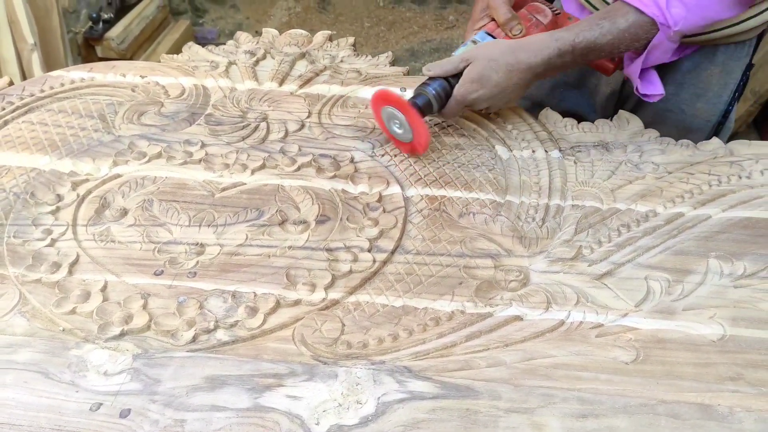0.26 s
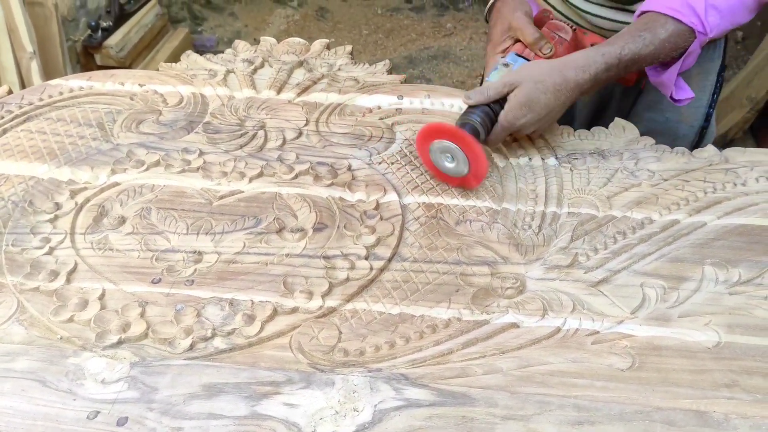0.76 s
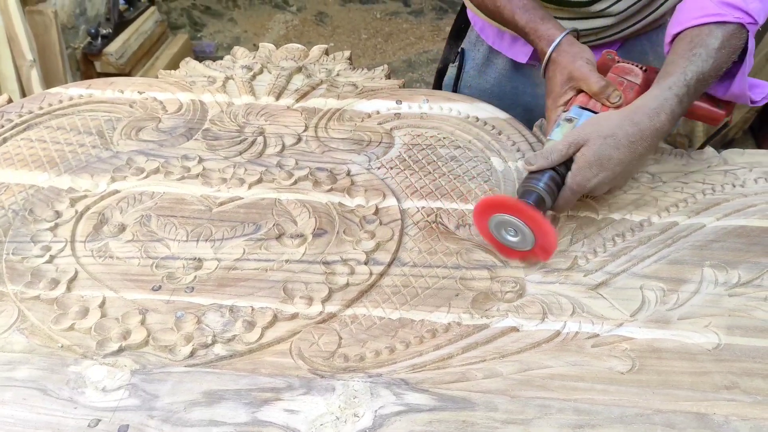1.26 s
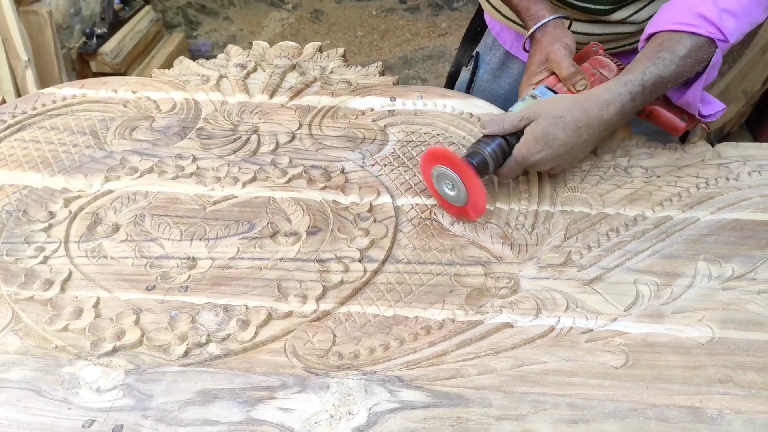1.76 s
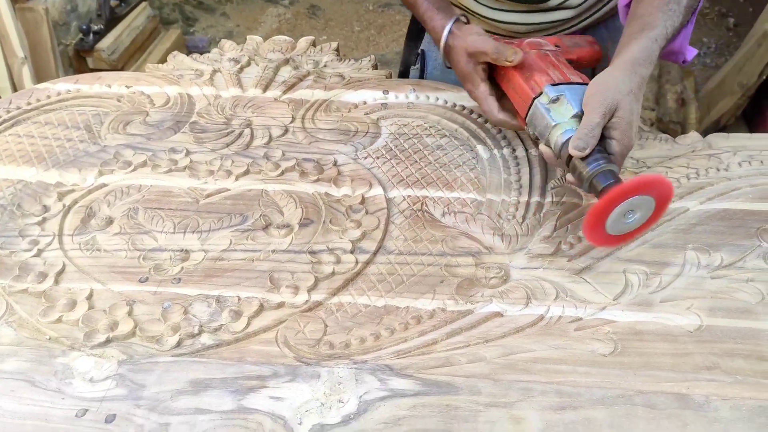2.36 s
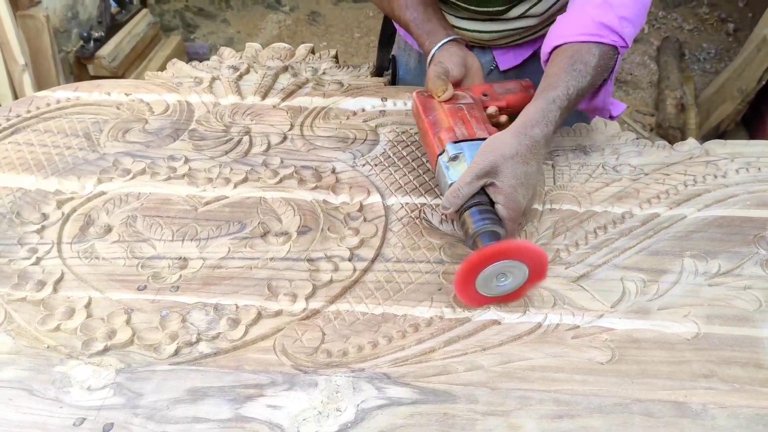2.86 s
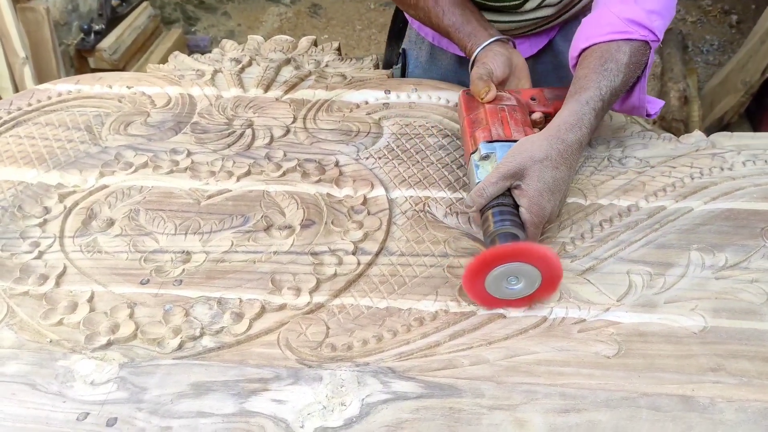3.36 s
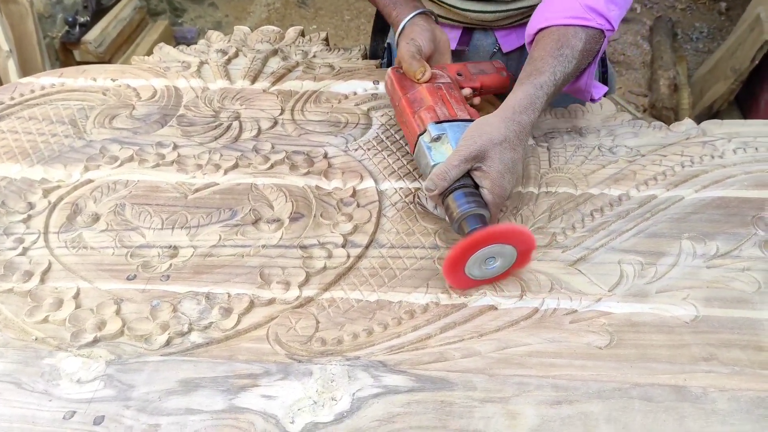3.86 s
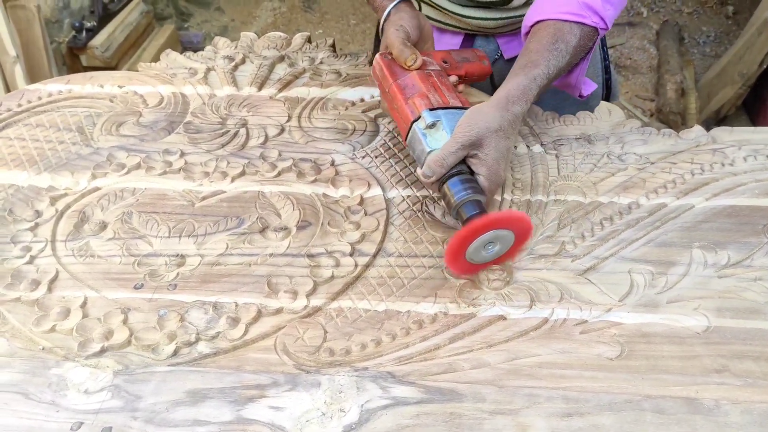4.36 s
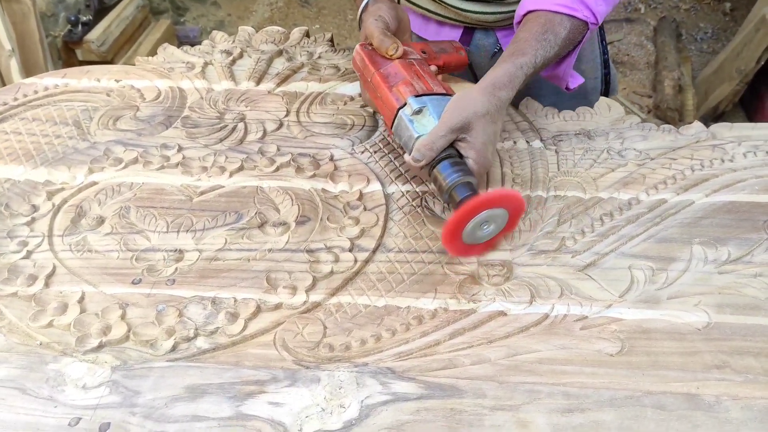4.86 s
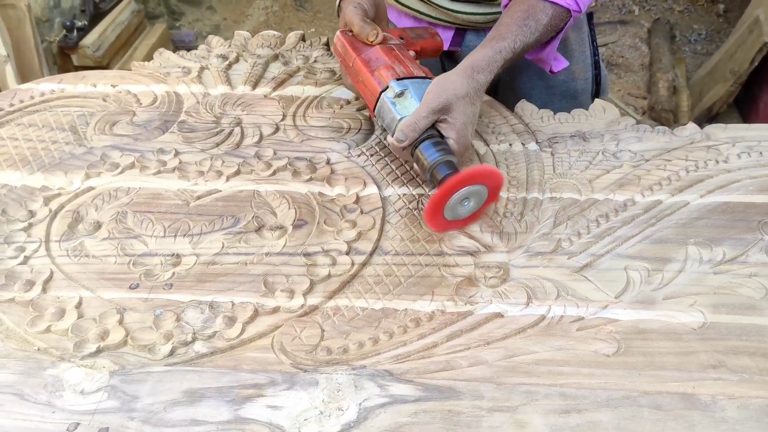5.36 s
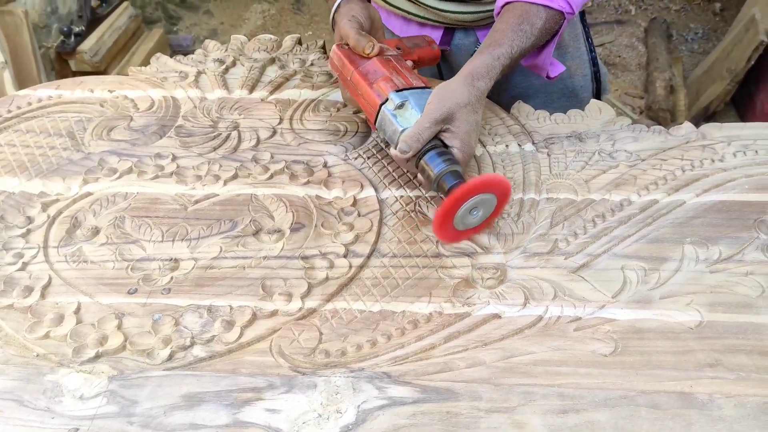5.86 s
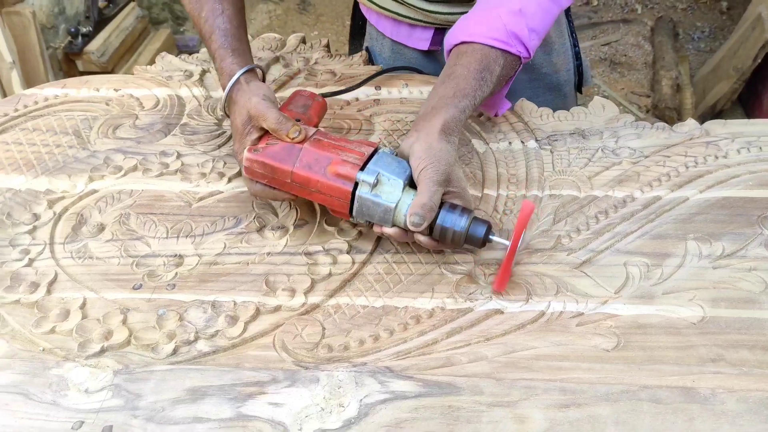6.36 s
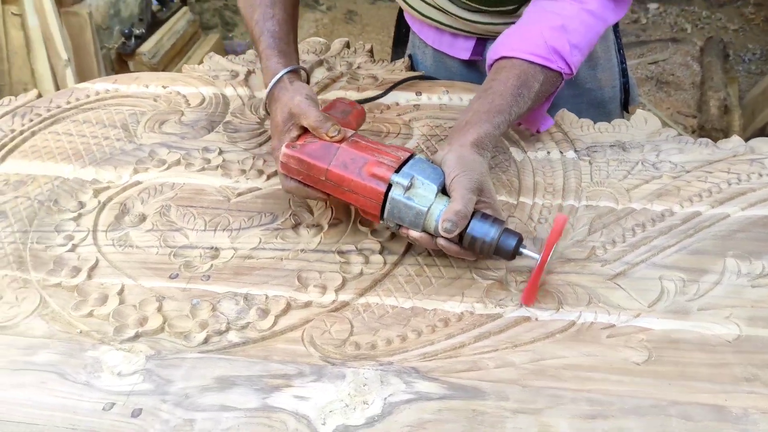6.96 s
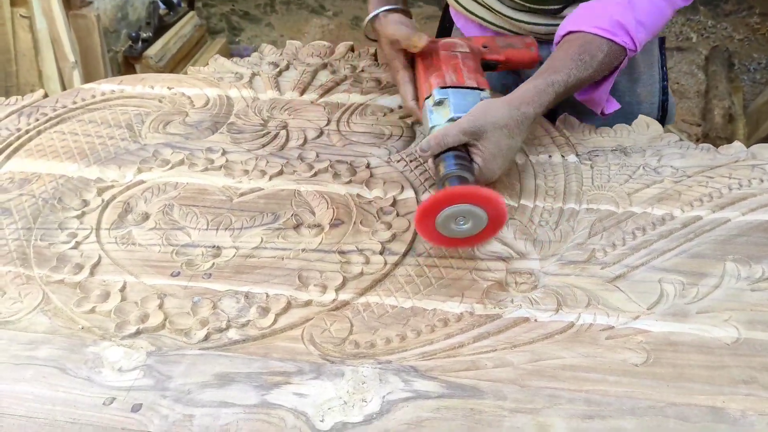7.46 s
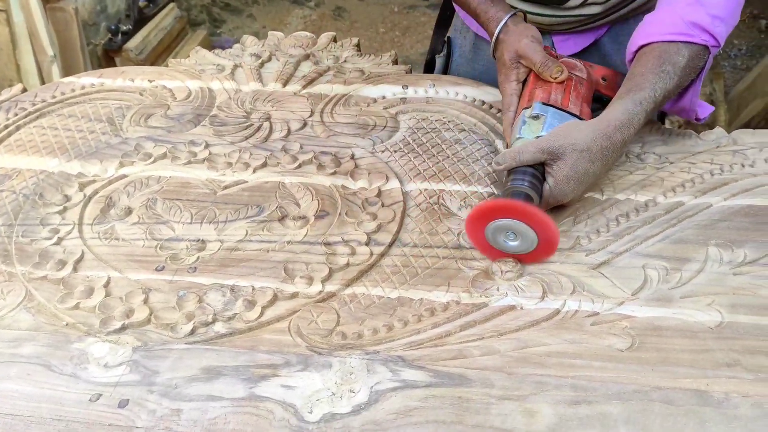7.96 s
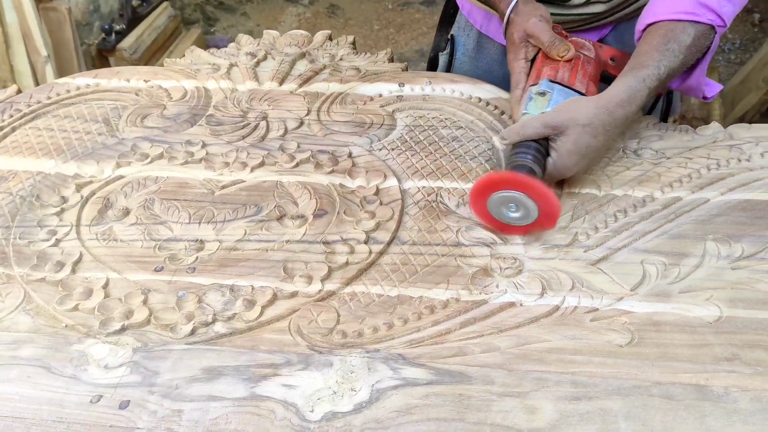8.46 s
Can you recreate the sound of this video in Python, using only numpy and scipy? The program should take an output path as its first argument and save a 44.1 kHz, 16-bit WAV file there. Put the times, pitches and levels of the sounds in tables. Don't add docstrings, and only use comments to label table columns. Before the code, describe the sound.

A close geared electric drill whines and roars without pause, its pitch sagging under load and rising when lifted, bristles rasping on carved wood.

```python
import sys
import numpy as np
from scipy import signal
from scipy.io import wavfile
from scipy.ndimage import uniform_filter1d

SR = 44100
rng = np.random.default_rng(int(sys.argv[2]) if len(sys.argv) > 2 else 0)


def to_wav(s):
    ch = np.atleast_2d(s).T
    pcm = np.round(np.clip(ch, -1, 1) * 32767)
    wavfile.write(sys.argv[1], SR, pcm.astype(np.int16))


def linear_from_db(decibels):
    return 10 ** (np.asarray(decibels, float) / 20)


N = 383669
STEP = 64

# start in seconds, armature speed this load settles to in turns per second [Hz].
PRESSES = [(0.0, 492.0), (0.09, 469.8), (0.21, 537.8), (0.29, 491.5), (0.52, 540.9), (0.69, 535.3),
           (0.85, 519.4), (1.06, 472.1), (1.24, 484.4), (1.37, 519.3), (1.45, 497.2), (1.53, 483.0),
           (1.77, 544.4), (1.85, 491.2), (1.93, 509.6), (2.08, 535.6), (2.17, 537.0), (2.28, 628.2),
           (2.37, 605.2), (2.53, 612.2), (2.79, 563.2), (2.91, 496.1), (3.05, 506.0), (3.34, 494.1),
           (3.53, 498.9), (3.88, 483.8), (4.05, 480.1), (4.17, 485.0), (4.33, 484.2), (4.47, 502.5),
           (4.57, 496.0), (4.69, 505.3), (4.85, 501.8), (4.97, 495.1), (5.05, 500.7), (5.17, 505.8),
           (5.38, 461.8), (5.47, 519.0), (5.57, 495.4), (5.76, 531.6), (5.93, 508.8), (6.03, 619.5),
           (6.21, 605.7), (6.3, 510.2), (6.45, 476.5), (6.73, 472.7), (7.17, 501.0), (7.27, 590.5),
           (7.39, 605.3), (7.49, 600.8), (7.61, 619.0), (7.75, 527.4), (7.86, 465.6), (8.07, 504.6),
           (8.17, 498.3), (8.29, 500.5), (8.53, 484.1), (8.61, 521.9)]
INERTIA_S, HAND_S = 0.25, 0.04
SLACK_HZ, TIGHT_HZ = 598, 550
SLACK_DB, QUICK_LAG_S, SLOW_LAG_S = -15, 0.062, 0.092

PINION_TEETH, SECOND_MESH, SLOTS = 7, 2.76, 12
SECOND_PLAY = 0.34
# multiple of the turn, level at full torque in dB.
UNEVEN_TEETH = [(4, -52), (5, -58), (6, -57), (8, -57), (9, -51.5), (10, -50), (11, -43.5), (13, -60),
                (15, -55), (16, -47), (17, -49), (18, -44), (19, -43), (20, -41), (22, -46), (23, -39),
                (24, -42), (25, -47), (26, -54), (27, -63), (28, -52), (30, -61)]
# pinion multiple, second mesh multiple, level at full torque in dB.
CROSS_TONES = [(0, 2, -56), (0, 3, -53), (1, -1, -55), (1, 1, -47), (2, -1, -47), (1, 3, -52), (2, 1, -54),
               (2, 3, -49)]
# time in seconds, mesh level in dB, its 2nd harmonic in dB, its 3rd in dB.
EARLY_STROKES = [
    [(0.0, -34, -29.5, -36), (0.1, -51.5, -68, -39.5), (0.2, -43, -55, -42), (0.3, -34.5, -34, -38),
     (0.44, -45, -42, -34), (0.54, -48.5, -42, -38), (0.63, -33.5, -47, -46), (0.75, -32.5, -46, -41),
     (0.85, -32, -42, -38), (0.96, -33, -46, -32), (1.08, -29, -45, -34), (1.3, -41, -45.5, -41)],
    [(1.38, -50, -52, -34), (1.5, -37.5, -43, -39), (1.6, -47, -41, -34), (1.68, -44.5, -41, -31),
     (1.8, -37.5, -43, -32.5), (2.01, -41.5, -45, -35), (2.13, -30, -40, -44), (2.22, -29, -39, -39),
     (2.33, -37, -31, -26)],
    [(2.86, -39, -32.5, -24), (3.0, -45, -42, -33), (3.1, -40, -42, -37), (3.16, -32.5, -42, -63),
     (3.58, -35.5, -46, -22.5), (3.67, -33.5, -55, -28.5), (4.06, -35, -36, -27.5), (4.21, -36, -32.5, -31),
     (4.4, -40.5, -33.5, -34)],
]
# time in seconds, mesh level in dB,
# its 2nd harmonic in dB, its 3rd in dB.
LATE_STROKES = [
    [(4.5, -43, -38, -33), (4.62, -41.5, -34, -30), (4.75, -44, -38, -36), (4.9, -40, -39.5, -31),
     (5.25, -35.5, -42.5, -34), (5.43, -36.5, -42, -34), (5.73, -36, -40, -39), (5.88, -36.5, -32, -44),
     (5.97, -30.5, -35, -25), (6.03, -35.5, -37, -44.0), (6.1, -40, -45, -41)],
    [(6.32, -56, -20.5, -25.5), (6.41, -41, -45.0, -40), (6.53, -28.5, -47, -42), (6.65, -27.5, -36, -29.5),
     (6.92, -35.5, -57, -27.5), (7.1, -32, -60, -43), (7.34, -36.5, -33, -37), (7.42, -36, -31, -38)],
    [(7.79, -34, -28, -30), (7.88, -37.5, -35, -42), (8.0, -35, -36, -30), (8.06, -35.5, -36.5, -28),
     (8.12, -38, -42, -53), (8.3, -36, -45, -35), (8.45, -28.5, -41.5, -30), (8.53, -37.5, -43, -42),
     (8.6, -51, -46, -53), (8.7, -31, -41, -36)],
]
# time in seconds, 2nd harmonic in dB, 3rd harmonic in dB.
STROKES_ASIDE = [
    [(0.0, -37, -31), (0.3, -40.5, -29.5), (0.54, -47, -33), (0.63, -40, -40.5), (0.81, -40, -40),
     (0.96, -29, -26), (1.08, -40, -28), (1.3, -38, -29)],
    [(1.38, -37, -32), (1.5, -38, -37), (1.68, -42, -30), (1.8, -44, -25), (2.01, -35, -35),
     (2.13, -34, -44), (2.22, -39, -36), (2.33, -32.0, -20)],
    [(2.86, -29, -28.0), (3.04, -44, -38), (3.16, -37, -44), (3.58, -47.5, -33), (3.67, -49.5, -36),
     (4.06, -38.5, -41), (4.21, -37.5, -42), (4.4, -41, -40)],
    [(4.5, -42, -44), (4.62, -46, -45), (5.25, -33, -38), (5.43, -35, -39), (5.73, -38.5, -39),
     (5.88, -28, -38.0), (5.97, -35.5, -24.5), (6.03, -33.0, -42), (6.1, -25.5, -25)],
    [(6.32, -25, -26.0), (6.41, -28, -36), (6.53, -37, -31), (6.65, -22, -26), (6.92, -30.5, -30),
     (7.1, -28.5, -31), (7.34, -29, -23), (7.42, -29.5, -25.5)],
    [(7.79, -29.0, -18.5), (7.88, -41.5, -24), (7.94, -36, -20), (8.0, -38, -29), (8.06, -38.5, -38),
     (8.12, -40, -41), (8.45, -40.5, -32), (8.68, -43, -23)],
]
# time in seconds, level in dB.
SECOND_WHINE = [(0.0, -44), (0.45, -52), (0.6, -64), (1.2, -39.5), (2.05, -41.5), (2.25, -44), (3.0, -41),
                (3.2, -46.5), (3.7, -51), (4.05, -39.5), (4.5, -41), (4.85, -47), (5.1, -40.5), (5.35, -46),
                (5.5, -41.5), (5.75, -45), (5.92, -52), (6.25, -44), (6.42, -33), (6.55, -42), (6.8, -45.5),
                (7.1, -39.5), (7.9, -54), (8.1, -43.5), (8.6, -39), (8.7, -39)]
# time in seconds, level in dB.
SLOT_WHINE = [(0.0, -57), (0.9, -56), (2.2, -51), (2.4, -37.5), (2.8, -41), (3.2, -42), (4.3, -42),
              (5.0, -42), (5.9, -44), (6.2, -43), (6.5, -48), (7.4, -44), (8.7, -54)]
UNBALANCE_DB, UNBALANCE_DB_PER_100HZ = -58.5, 5
GRIP_START_S, GRIP_END_S, GRIPPED_DB = 2.95, 7.4, -9

# time in seconds, gear case turned this way in dB,
# vents turned this way in dB, pinion left-right difference in dB, vents left-right difference in dB.
HOLD = [(0.0, -2, -1.5, 11, 8), (0.3, -1.5, 0.5, -24, -3), (0.55, -2.5, -0.5, 5, 6),
        (0.9, -1.5, -2, -7, -6.5), (1.15, -1, -0.5, -4, -0.5), (1.4, -3.5, -1, 16, 0.5),
        (1.68, -2.5, -1, 25, 4), (2.15, -2.5, -0.5, 8, -3.5), (2.36, -3, -4, -2, -4.5), (2.6, 1, 1, 6, -4),
        (2.92, 1.5, 3.5, 2, 0), (3.5, -0.5, 2, -14.5, -5), (4.0, 1, 0.5, 3.5, -0.5),
        (4.9, -0.5, 1, 1, -1.5), (5.4, -0.5, 1.5, -3, 0), (5.98, -0.5, 1, -4, -3.5),
        (6.17, -2.5, -4, -1, -3), (6.47, 1.5, 2.5, 1, -3), (6.75, -2, -0.5, -20, -0.5),
        (7.15, -0.5, 2.5, -13, -6), (7.3, 0, -2, -27, -4.5), (7.55, -2.5, 1.5, -14, -1.5),
        (7.75, -2, -2.5, -20, 1), (8.04, -0.5, 0, -7, 4), (8.15, -2, 0, -3, -1.5), (8.5, -1.5, -1, -6, 3.5),
        (8.7, -2.5, -1.5, -5, 4)]
# frequency in Hz, level in dB per Hz.
CASING = [(180, -44), (300, -18.5), (481, -11), (593, -16), (1030, -2), (1320, 0.5), (1630, -5),
          (1960, -2.5), (2140, -4.5), (3080, -5.5), (3300, -13.5), (4290, -55), (7260, -120)]
ROAR_DB, ROAR_FACING = -34.5, 0.13
ROAR_DB_PER_100HZ = 2
ROAR_DB_BRAKING = 0.64
# frequency in Hz, level in dB per Hz.
VENTS = [(4590, -38), (7800, -6), (8540, -10.5), (9300, -5), (9970, 5), (10700, 3.5), (11800, 2),
         (12800, -6), (13500, -28), (14200, -14), (15000, -10), (15900, -19)]
HISS_DB, SWAY_DB, SWAY_PER_S = -21.5, 3.5, 2.3

# frequency in Hz, level in dB per Hz.
BRISTLES = [(1500, -17), (2600, -15), (3600, 0), (4400, -4), (5500, 0), (6050, -0.5), (6450, -6),
            (7600, -3.5), (8600, -2), (10000, -21)]
RAKE_DB = -33
SQUARE_START_S, SQUARE_END_S, SQUARE_NARROWS = 2.6, 5.96, 0.44
# frequency in Hz, level in dB per Hz.
THRUM = [(20, -14), (30, -3), (90, -8.5), (160, 0), (210, -6), (260, -24)]
# time in seconds, level in dB.
DIG = [(0.0, -3), (0.7, -11), (1.3, -9), (2.0, -5), (2.7, -1), (3.2, -1), (3.8, 3), (4.4, 4), (5.0, -3),
       (5.6, 3), (6.2, -11), (6.7, 4), (7.2, 1), (7.6, -8), (8.1, 3), (8.7, 2)]
THRUM_DB, THRUM_LIFTED_DB, THRUM_WANDER_DB = -64, -2.5, 1.5

# frequency in Hz, level in dB per Hz.
YARD = [(110, -54), (190, -16.5), (226, 3.5), (253, -28), (308, -4.5), (500, -3.5), (650, -26),
        (1100, -120)]
YARD_DB = -53.5
# frequency in Hz, width in Hz, level in dB.
FAR_HUM = [
    (159, 8.7, -69.5),
    (257.3, 9.8, -62.5),
]

# frequency in Hz, left-right correlation [-1 to 1].
LIKENESS = [(30, 0.4), (60, 0.57), (130, 0.97), (290, 0.97), (640, 0.87), (1410, 0.68), (3100, 0.00067),
            (6820, 0.11), (15000, -0.13)]
LEFT_BRIGHT_HZ, LEFT_BRIGHT = 12600, 0.38
# frequency in Hz, threshold over the band level in dB.
THINNING = [(900, -25), (1500, -10), (2200, -1), (2900, 2), (3600, 0), (4400, 3.7), (6500, 4.6),
            (8600, 4.7), (10500, 4.1), (12500, 4.3), (13400, 6.5), (14500, 4.3)]


def rms_one(x):
    return x / np.sqrt(np.mean(x ** 2) + 1e-20)


def in_time(rows):
    s, *columns = np.transpose(rows)
    return [np.interp(np.arange(N) / SR, s, c) for c in columns]


def at_hz(points, hz):
    table_hz, level = np.transpose(points)
    return np.interp(np.log(hz), np.log(table_hz), level)


def fine(control):
    return np.interp(np.arange(N) / STEP, np.arange(len(control)), control)


def coarse(curve):
    return np.interp(np.arange(N // STEP + 2) * STEP, np.arange(N), curve)


def coarse_drift(rate):
    r = np.exp(-2 * np.pi * STEP * rate / SR)
    noise = rng.standard_normal(N // STEP + 2002)
    return rms_one(signal.lfilter([1], [1, -2 * r, r * r], noise)[2000:])


def drift(rate):
    return fine(coarse_drift(rate))


def lag(x, seconds):
    r = np.exp(-STEP / SR / seconds)
    return signal.lfilter([1 - r], [1, -r], x - x[0]) + x[0]


def pan(db):
    return linear_from_db(np.reshape(db, (1, -1)) * [[0.5], [-0.5]])


def coloured(exciter, spectrum, patchy_db, count=4):
    out, together = 0, drift(21.0)
    edges = 20 * 2 ** np.arange(0, 9.9, 1 / count)
    for k, (low, high) in enumerate(zip(edges, edges[1:])):
        hz = np.sqrt(low * high)
        if spectrum[0][0] < hz < spectrum[-1][0]:
            band = signal.butter(2, [low, high], "band", fs=SR, output="sos")
            mid, side = signal.sosfilt(band, exciter[k % 2])
            alike = np.clip(at_hz(LIKENESS, hz), -1, 1)
            gain = linear_from_db(at_hz(spectrum, hz) + patchy_db * (0.71 * together + drift(6.1)))
            out = out + gain * (np.sqrt(1 + alike) * mid + np.sqrt(1 - alike) * side * [[1], [-1]])
    return rms_one(out)


def motor():
    s, settles_hz = np.transpose(PRESSES)
    now = np.arange(N // STEP + 2) * STEP / SR
    load_hz = settles_hz[np.searchsorted(s, now, side="right") - 1]
    quick_hz = lag(lag(load_hz, QUICK_LAG_S / 2), QUICK_LAG_S / 2)
    seated_hz = np.maximum(lag(load_hz, SLOW_LAG_S), quick_hz)
    bearing = np.clip((SLACK_HZ - seated_hz) / (SLACK_HZ - TIGHT_HZ), 0, 1)
    return lag(lag(load_hz, HAND_S), INERTIA_S), bearing


def whines(turns_hz, bearing):
    float_db = SLACK_DB * (1 - bearing)
    pinion = in_time(np.concatenate(EARLY_STROKES + LATE_STROKES))
    aside = in_time(np.concatenate(STROKES_ASIDE))
    meshes_db = np.array([coarse(c) for c in in_time(SECOND_WHINE) + pinion + aside]) + float_db
    s = np.arange(len(turns_hz)) * STEP / SR
    gripped = lag(1.0 * (s > GRIP_START_S) * (s < GRIP_END_S), 0.12)
    unbalance_db = UNBALANCE_DB + UNBALANCE_DB_PER_100HZ * (turns_hz - 500) / 100
    unbalance_db = unbalance_db + GRIPPED_DB * gripped * bearing
    return float_db, unbalance_db, coarse(*in_time(SLOT_WHINE)), *meshes_db


def tone(angle, multiple, mid_db, side_db, wander_db, lean=0, aside_db=6.0, loose=0.058):
    play = loose * multiple * coarse_drift(30.0) + rng.uniform(0, 2 * np.pi)
    flutter_db = 1.7 * coarse_drift(35.0)
    mid_gain = fine(linear_from_db(mid_db + flutter_db + wander_db * coarse_drift(2.5)))
    mid = mid_gain * np.sin(multiple * angle + fine(play))
    turn = play + 1.7 * coarse_drift(1.06)
    side_gain = fine(linear_from_db(side_db + flutter_db + aside_db * coarse_drift(3.2)))
    side = side_gain * np.cos(multiple * angle + fine(turn)) + lean * mid
    return np.sqrt(2) * np.array([mid + side, mid - side])


def gears(angle, whines_db, pinion_pan_db, facing_db):
    float_db, unbalance_db, slot_db, second_db, *mesh_db, aside2_db, aside3_db = whines_db
    pinion_lean = np.tanh(pinion_pan_db / 14)
    out = tone(angle, 1, unbalance_db + 2.0, unbalance_db - 30, wander_db=0.1, lean=0.11)
    out += tone(angle, SECOND_MESH, second_db + 1.0, second_db - 5.5, wander_db=3.0, lean=0.2,
                loose=SECOND_PLAY)
    out += tone(angle, PINION_TEETH, mesh_db[0] + 0.9, mesh_db[0] - 8, wander_db=1.0, aside_db=0.5,
                lean=pinion_lean)
    out += tone(angle, 2 * PINION_TEETH, mesh_db[1] + 0.3, aside2_db - 0.6, wander_db=3.5, aside_db=5.5)
    out += tone(angle, 3 * PINION_TEETH, mesh_db[2] + 0.33, aside3_db - 0.6, wander_db=0.5, aside_db=6.5)
    out += tone(angle, SLOTS, slot_db, slot_db - 1.5, wander_db=1.5, aside_db=2.5)
    torque_db = 0.74 * float_db + 2.0 * facing_db
    for multiple, db in UNEVEN_TEETH:
        level_db = db + torque_db
        out += tone(angle, multiple, level_db - 0.5, level_db - 1, wander_db=1.8, aside_db=2.5)
    for first, second, db in CROSS_TONES:
        multiple = first * PINION_TEETH + second * SECOND_MESH
        level_db = db + torque_db
        out += tone(angle, multiple, level_db + 0.6 * facing_db, level_db - 4, wander_db=2.0, aside_db=2.5)
    return out


def casing(roar_db):
    roar = coloured(rng.standard_normal((2, 2, N)), CASING, patchy_db=1.27, count=6)
    return linear_from_db(roar_db + 0.96) * roar * pan(0.93)


def vents(angle, hiss_db, pan_db):
    throb = 1 + 0.11 * np.sin(angle)
    hiss = coloured(rng.standard_normal((2, 2, N)), VENTS, patchy_db=0.71, count=8)
    return linear_from_db(hiss_db) * throb * hiss * pan(pan_db)


def bristles(rake_db):
    shape = (2, 2, N)
    struck = rng.random(shape) < 9000 / SR
    snaps = struck * linear_from_db(1.06 * rng.exponential(1, shape)) * rng.choice([-1, 1], shape)
    rake = coloured(snaps, BRISTLES, patchy_db=2.0, count=6)
    s = np.arange(N // STEP + 2) * STEP / SR
    narrow = SQUARE_NARROWS * fine(lag(1.0 * (s > SQUARE_START_S) * (s < SQUARE_END_S), 0.15))
    rake = rake + narrow * (rake.mean(axis=0) - rake)
    return linear_from_db(rake_db + 4.5 + 0.98 * narrow) * rake * pan(-0.19)


def board(bearing):
    thrum = coloured(rng.standard_normal((2, 2, N)), THRUM, patchy_db=3.0, count=3)
    lifted_db = THRUM_LIFTED_DB * (1.5 - fine(bearing))
    level_db = THRUM_DB + in_time(DIG)[0] + lifted_db + THRUM_WANDER_DB * drift(8.5)
    return linear_from_db(level_db) * thrum * pan(1.2)


def yard():
    rumble = coloured(rng.standard_normal((2, 2, N)), YARD, patchy_db=-2.0)
    out = linear_from_db(YARD_DB - 4.5) * rumble * pan(6.7)
    for hz, width_hz, db in FAR_HUM:
        r = np.exp(-np.pi * width_hz / SR)
        poles = [1, -2 * r * np.cos(2 * np.pi * hz / SR), r * r]
        hum = rms_one(signal.lfilter([1, 0, -1], poles, rng.standard_normal(N)))
        out += linear_from_db(db + 2.0 * drift(0.79)) * hum
    return out


def scene():
    turns_hz, bearing = motor()
    angle = 2 * np.pi * np.cumsum(fine(turns_hz)) / SR
    facing_db, vents_db, pinion_pan_db, vent_pan_db = in_time(HOLD)
    roar_db = ROAR_DB + ROAR_FACING * facing_db + ROAR_DB_PER_100HZ * (fine(turns_hz) - 500) / 100
    braking = np.maximum(-np.gradient(turns_hz) * SR / STEP, 0)
    roar_db += ROAR_DB_BRAKING * fine(braking) / 100
    drill = gears(angle, whines(turns_hz, bearing), pinion_pan_db, coarse(facing_db))
    drill += casing(roar_db)
    drill += vents(angle, HISS_DB + vents_db, vent_pan_db + SWAY_DB * drift(SWAY_PER_S))
    drill += bristles(RAKE_DB + facing_db)
    return drill + board(bearing) + yard()


def thinned(x):
    n, k = np.arange(2048)[:, None], np.arange(1024)
    window = np.sin(np.pi * (n + 0.5) / 2048)
    basis = window * np.cos(np.pi / 1024 * (n + 512.5) * (k + 0.5)) / np.sqrt(512)
    padded = np.pad([x[0] + x[1], x[0] - x[1]], [(0, 0), (1024, 2048 - N % 1024)]).reshape(2, -1, 1024)
    lines = np.concatenate([padded[:, :-1], padded[:, 1:]], axis=2) @ basis
    band = np.where(k < 256, k // 16, 8 + k // 32)
    member = (band[:, None] == band) / np.bincount(band)[band]
    around = np.mean(lines ** 2, axis=0) @ member
    luck = rng.standard_normal(lines.shape)[:, :, band]
    threshold_db = at_hz(THINNING, (k + 0.5) * SR / 2048) + 1.3 * luck
    kept = lines * (lines ** 2 > around * linear_from_db(threshold_db) ** 2)
    left_over = uniform_filter1d(np.mean(kept ** 2, axis=0) @ member, size=9, axis=0)
    before = uniform_filter1d(around, size=9, axis=0)
    restore = np.sqrt(before / (left_over + 0.18 * before + 1e-20))
    frames = kept * restore @ basis.T
    mid, side = (frames[:, :-1, 1024:] + frames[:, 1:, :1024]).reshape(2, -1)[:, :N] / 2
    return np.array([mid + side, mid - side])


def roll_off(x):
    return signal.sosfilt(signal.butter(12, 16440, fs=SR, output="sos"), x)


def record(dry):
    bright = signal.butter(2, LEFT_BRIGHT_HZ, "high", fs=SR, output="sos")
    treble = signal.sosfiltfilt(bright, dry)
    heard = dry + LEFT_BRIGHT * treble * [[1], [-1]]
    top = signal.cheby2(16, 60, 15820, fs=SR, output="sos")
    mix = signal.sosfilt(top, thinned(heard))
    return roll_off(mix)


dry = scene()
out = record(dry)
to_wav(out)
```